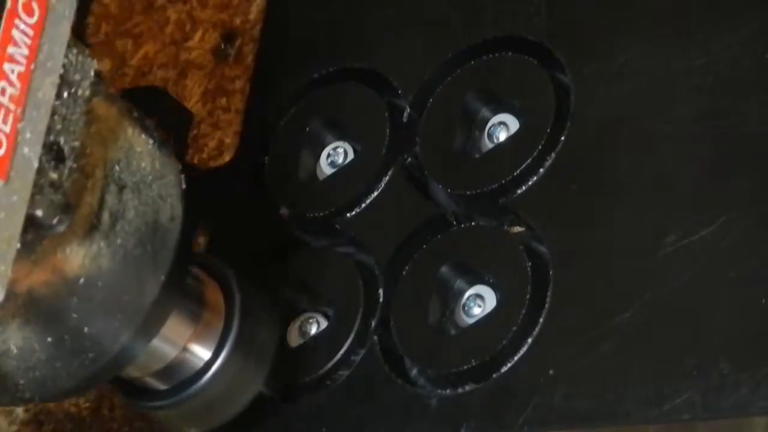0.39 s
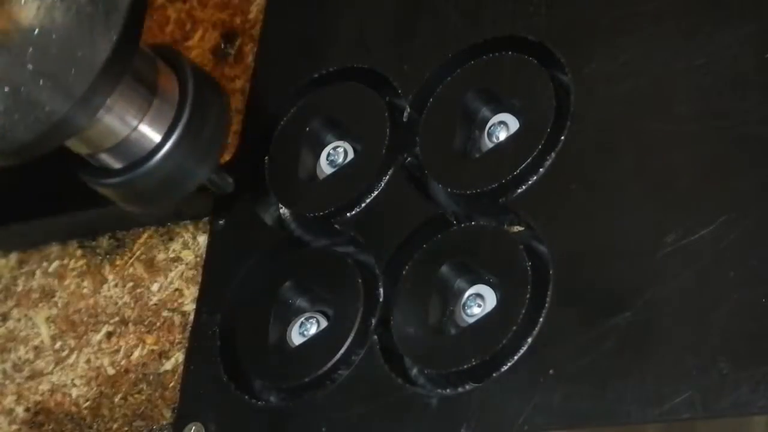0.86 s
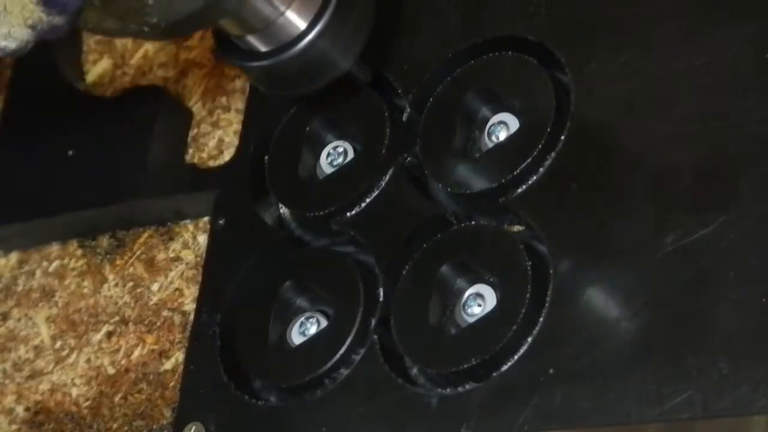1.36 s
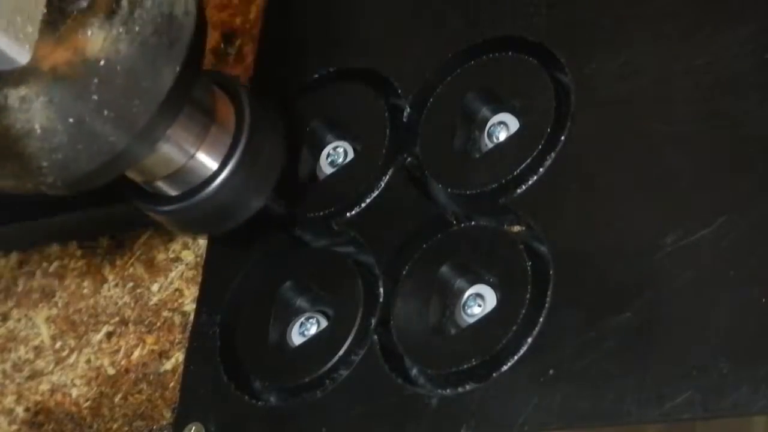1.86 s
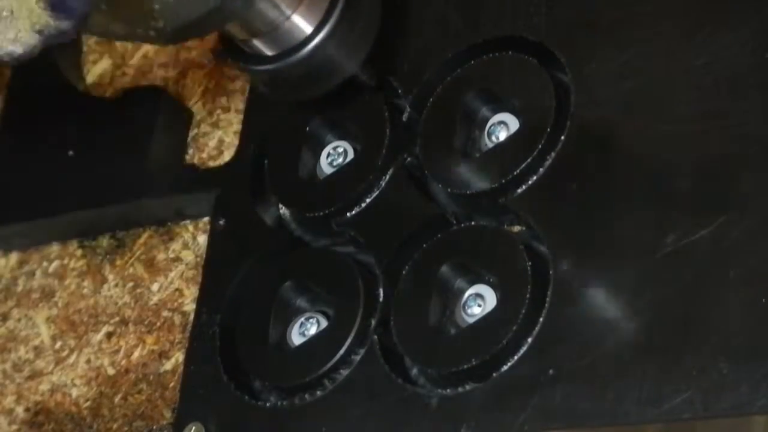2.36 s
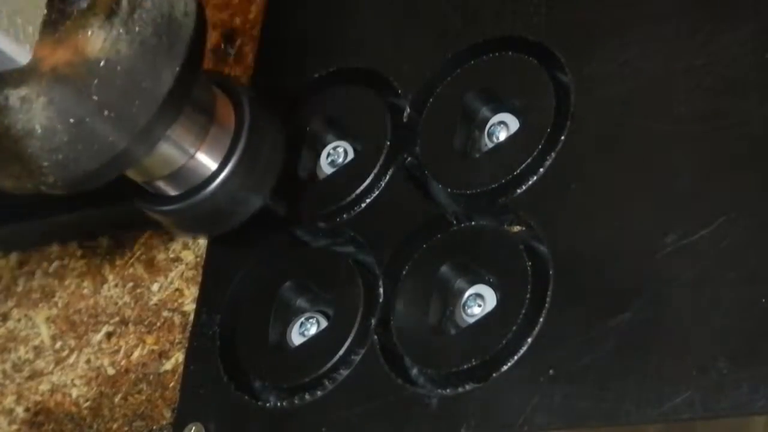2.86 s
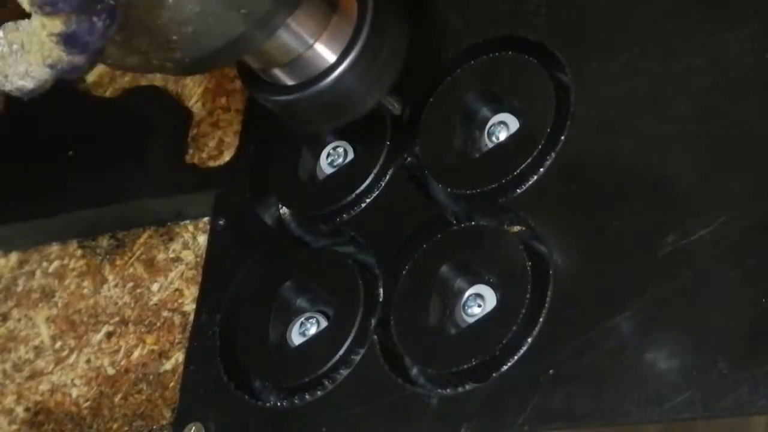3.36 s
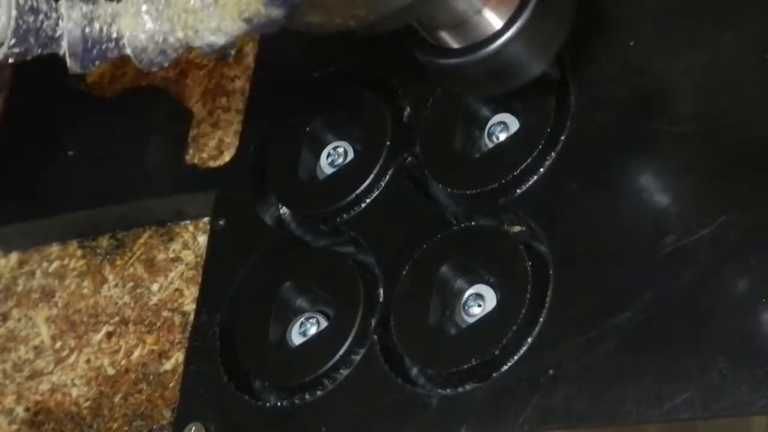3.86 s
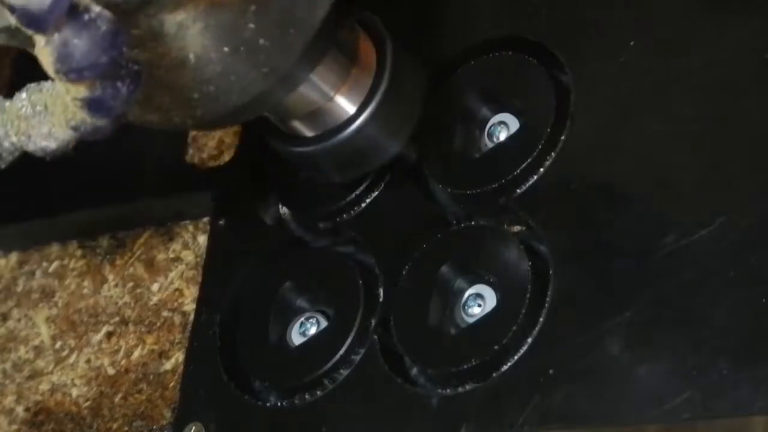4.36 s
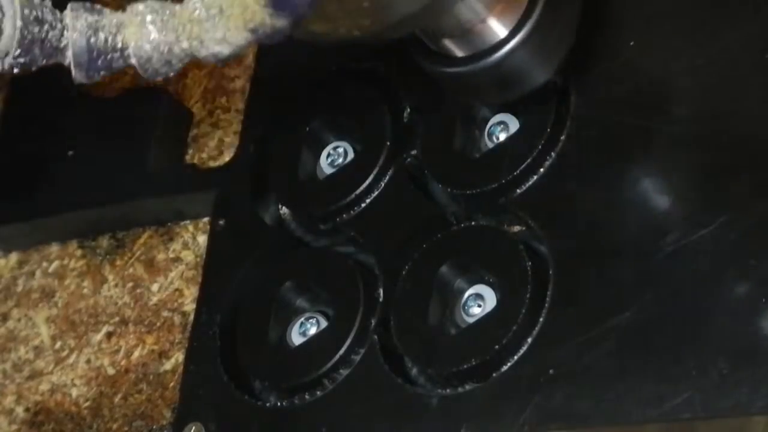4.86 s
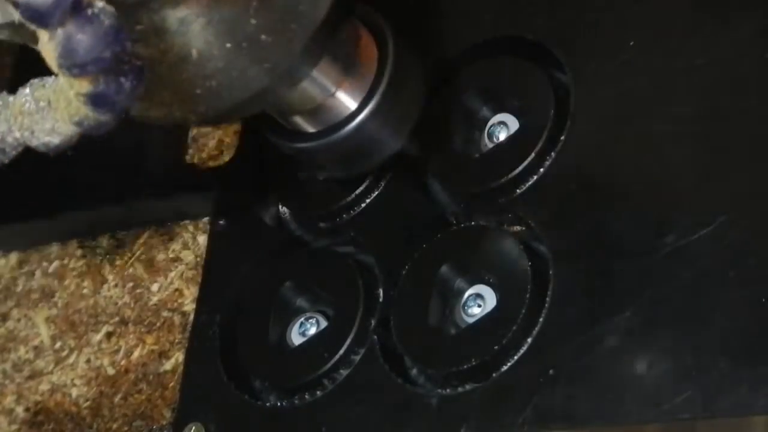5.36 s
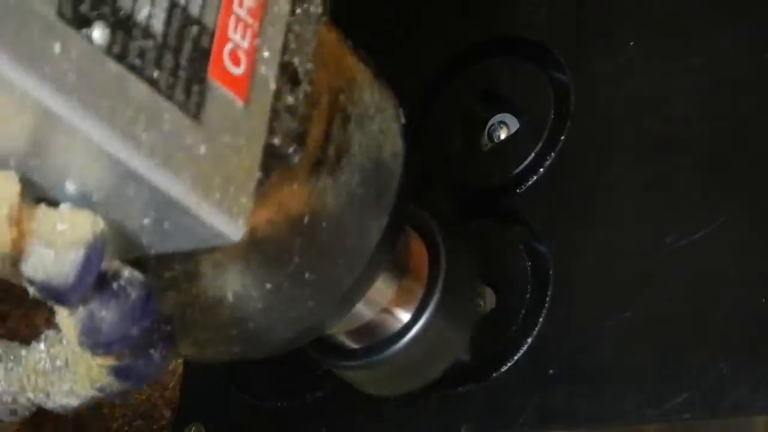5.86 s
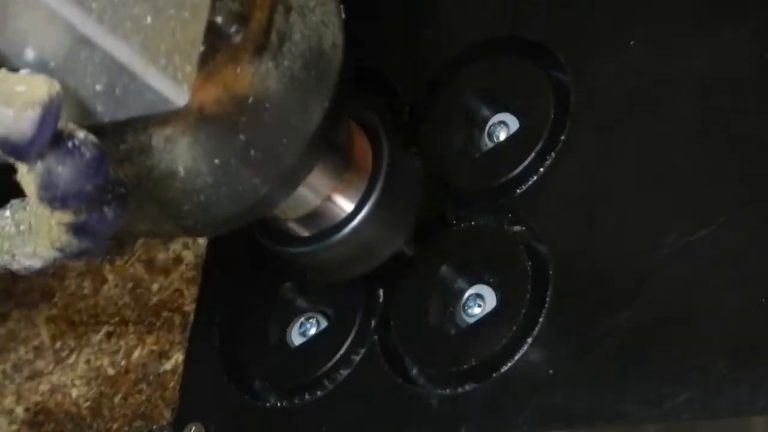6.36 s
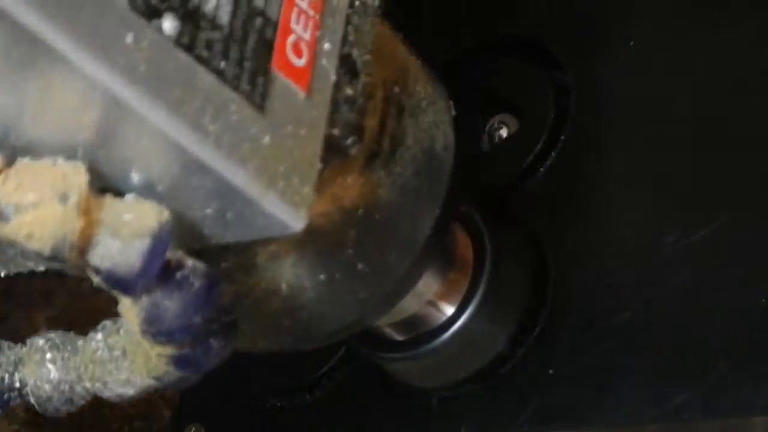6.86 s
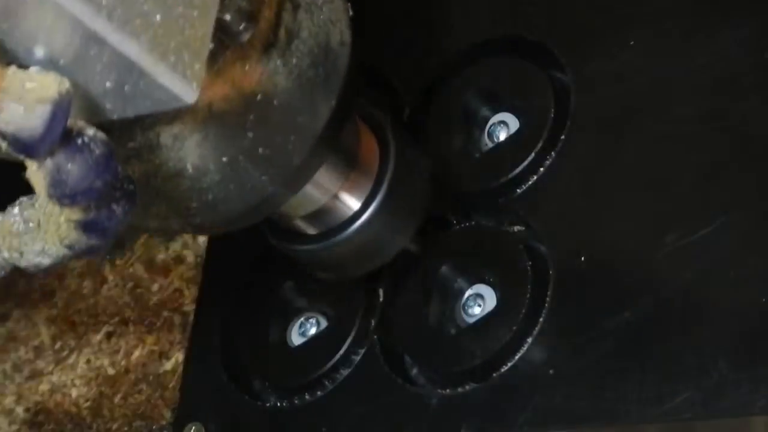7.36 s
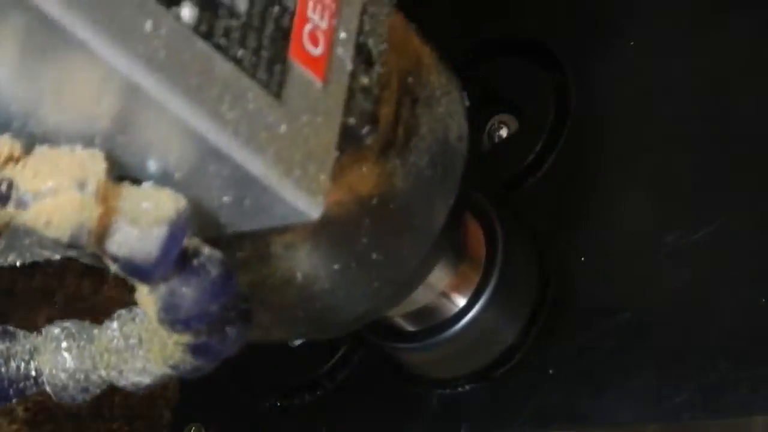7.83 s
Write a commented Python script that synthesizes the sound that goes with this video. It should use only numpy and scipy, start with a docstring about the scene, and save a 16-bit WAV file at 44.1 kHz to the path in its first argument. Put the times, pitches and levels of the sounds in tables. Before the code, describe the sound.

Continuous harsh, airy hiss from a compressed-air jet, almost without bass, close to an overdriven stereo microphone. A slightly trembling spindle whine and fainter, higher whistle run through it over a weak low machine wash. Low crackle sputters on and off irregularly. A faint motor squeal comes near one second, a stronger one past three, and a lower, doubled one shortly before six.

```python
"""A router spindle works over a plastic sheet while a compressed-air nozzle hisses loudly throughout.
The hiss is shaped noise; thin sine whines of spindle and drive, and steady hums, stand in it over a low wash.
From the start the overloaded microphone adds low crackle, the smoothed square of the sound,
which drops out again and again. An axis motor sings faintly near 0.9 s, then louder near 3.3 and 5.8 s."""
import sys
import numpy as np
from scipy import signal
from scipy.fft import rfft, irfft
from scipy.io import wavfile
from scipy.ndimage import uniform_filter1d

SR = 44100
rng = np.random.default_rng(int(sys.argv[2]) if len(sys.argv) > 2 else 0)


def field_ratio(decibels):
    """Amplitude ratio for a level in dB (20 dB per decade); scalars and array-likes work."""
    return 10 ** (np.asarray(decibels, dtype=float) / 20)


def int16_out(signal):
    """Quantize to a 16-bit WAV file."""
    q = np.round(np.clip(np.atleast_2d(signal).T, -1, 1) * 32767)
    wavfile.write(sys.argv[1], SR, q.astype(np.int16))


N = 351477
T = np.arange(N) / SR

# moving nozzle: time_s, hiss_db (before panning), whistle_centre_hz, facing (0 away - 1 facing)
NOZZLE = [(0, -23.5, 6600, 0.63), (.2, -25.5, 6340, 0.61), (.58, -23, 6440, .8), (.92, -24.5, 6740, 0.84),
          (1.35, -25.5, 6300, 0.35), (2.1, -23.5, 6200, .41), (2.62, -25.5, 6290, .5),
          (3.06, -23.5, 6600, 0.66), (3.5, -26.3, 6200, 0.59), (4.0, -24.5, 5900, 0.44),
          (4.8, -26, 6140, 0.42), (5.1, -25, 5800, 0.34), (5.68, -25.5, 6540, 0.52),
          (5.86, -24.5, 5930, 0.64), (6.28, -24, 6100, 0.5), (6.66, -26, 5900, 0.47),
          (7.26, -24, 6100, 0.49), (7.59, -26.5, 6200, 0.49), (7.97, -24.5, 6000, 0.52)]


def evened(x):
    """Scales to rms 1."""
    return x / np.sqrt(np.mean(x ** 2) + 1e-20)


def read(points, hz):
    """Spectrum value at hz, straight lines on a log axis."""
    f, value = np.transpose(points)
    return np.interp(np.log(hz + 1), np.log(f + 1), value)


def follow(rows, t):
    """Every column of a curve at times t."""
    s, *columns = np.transpose(rows)
    return [np.interp(t, s, c) for c in columns]


def wander(corner_hz):
    """Random curve of rms 1: white noise low-passed at corner_hz."""
    z = rfft(rng.standard_normal(N))
    lowpass = 1 / (1 + (np.fft.rfftfreq(N, 1 / SR) / corner_hz) ** 2)
    return evened(irfft(z * lowpass, N))


def patchwork(frames, bins, smooth_bins, smooth_frames):
    """Random patches of rms 1 over frequency and time."""
    grain = rng.standard_normal((frames, bins)).T
    grain = uniform_filter1d(grain, size=smooth_bins, axis=0)
    return evened(uniform_filter1d(grain, size=smooth_frames, axis=1))


def noise(field_db, size):
    """Stereo noise by inverse STFT: shared centre plus unrelated side, shaped by field_db(hz, s)."""
    # unrelated left-minus-right part, before its patches: freq_hz, side_re_centre_db
    sideways = [(60, -14), (300, -15), (800, 0.5), (1500, -11), (2300, -22), (2900, -12.5), (3600, -6.5),
                (4300, -10.5), (5000, -15.5), (6300, -15.5), (8000, -13), (10000, -10.5), (12000, -14.5),
                (15000, -15)]
    # stereo tilt: freq_hz, left_minus_right_db
    tilt = [(60, 0.0), (240, -3), (950, -4), (3770, 1), (15000, 0.5)]
    hop = size // 4
    frames, hz = N // hop + 5, np.fft.rfftfreq(size, 1 / SR)[:, None]
    a, b, c, d = rng.standard_normal((frames, size // 2 + 1, 4)).T
    centre = a + 1j * b
    side = field_ratio(read(sideways, hz)) * (c + 1j * d)
    side *= field_ratio(4.0 * patchwork(frames, len(hz), 9, 40))  # stereo width varies in random patches
    half_tilt_db = read(tilt, hz) / 2
    z = np.array([centre + side, centre - side])
    z *= field_ratio(field_db(hz, np.arange(frames) * hop / SR) + np.array([half_tilt_db, -half_tilt_db]))
    return signal.istft(z, nperseg=size, noverlap=size - hop)[1][:, :N]


def jet_field(hz, t):
    """Two colours blended as the nozzle turns, a sliding whistle band, cavity bands and drifting patches."""
    # relative hiss spectra before the bass cut, nozzle facing and away: freq_hz, density_db
    facing_spectrum = [(1180, -34), (2000, -38), (2520, -17.5), (3070, -8.5), (4300, -12), (5060, -8.5),
                       (5560, -3), (6330, -2.5), (8120, -13), (9000, -10), (10200, -6.5), (13000, 1.5),
                       (15600, -6.5)]
    away_spectrum = [(1180, -44), (2000, -13), (2460, -15.5), (3050, -4), (3130, -6.5), (4410, -5),
                     (5020, -3.5), (5560, -3.5), (6220, -0.5), (7640, -5), (10600, -9.5), (12800, 0.5),
                     (15600, -3)]
    # gaps around spindle and table colour the hiss: centre_hz, width_hz, gain_db
    cavities = [(3460, 255, 2.5), (4720, 68, 4.5), (5150, 140, 1), (5560, 190, -5.5), (6110, 94, 3),
                (6830, 200, 2.5), (7230, 140, 1.5), (9230, 260, 3.5), (11000, 300, 0.5), (11950, 180, -2.5),
                (13240, 330, 2), (14300, 250, 3.5), (15320, 350, 5)]
    _, centre_hz, facing = follow(NOZZLE, t)
    facing = np.clip(facing, 0, 1)
    body = facing * read(facing_spectrum, hz) + (1 - facing) * read(away_spectrum, hz)
    body += 25 * np.log10(np.clip(hz / 1200, 1e-3, 1))  # a small jet makes no bass
    whistle = 2.9 * np.exp(-((hz - centre_hz) / 350) ** 2)
    colour = sum(db * np.exp(-((hz - f) / width_hz) ** 2) for f, width_hz, db in cavities)
    return body + whistle + colour + 0.95 * patchwork(len(t), len(hz), 7, 24)


def air_jet():
    """Turbulent hiss; eddies make all its bands flutter together."""
    hiss = noise(jet_field, size=512)
    flutter_db = 1.0 * wander(56) + 0.62 * wander(380) + 1.0 * wander(1100)
    hiss = hiss * field_ratio(flutter_db)
    slow_rms = np.sqrt(uniform_filter1d(hiss.mean(0) ** 2, size=5000))
    return field_ratio(follow(NOZZLE, T)[0]) * hiss / slow_rms


def nearness():
    """How far the hiss stands above its usual -25 dB, in dB."""
    return follow(NOZZLE, T)[0] + 25


def tone(hz, rms_db, blur_hz):
    """A sine whose pitch trembles by blur_hz rms."""
    turns = np.cumsum(hz + blur_hz * wander(13.1)) / SR + rng.random()
    return np.sqrt(2) * field_ratio(rms_db) * np.sin(2 * np.pi * turns)


def motors():
    """Trembling sines: spindle whine with its octave, drive whistle, hums and gated axis songs."""
    # spindle whine, mean level: time_s, level_db
    whine = [(0, -45), (.26, -51.5), (.53, -42.5), (.9, -43), (1.15, -46), (1.46, -43), (1.63, -49.5),
             (2.06, -42.5), (2.7, -48), (3, -45), (3.4, -50), (4.0, -44), (4.55, -50.5), (4.97, -43),
             (5.65, -50.5), (5.88, -42.5), (6.04, -54), (6.25, -44), (6.6, -48), (7.26, -44), (7.42, -51.5),
             (7.97, -40.5)]
    # hums, two of them a close pair, mean level: pitch_hz, level_db
    hums = [(1369, -60.5), (1353, -59), (2777, -60)]
    # axis motor during fast moves, mean level: start_s, end_s, pitch_hz, level_db
    axis_songs = [(.85, 1.02, 9530, -55), (3.245, 3.45, 9535, -41), (3.245, 3.45, 9465, -43),
                  (3.245, 3.45, 9600, -49), (5.645, 5.93, 4021, -43), (5.65, 5.92, 4095, -45),
                  (5.63, 5.95, 9470, -48)]
    whine_hz, drive_hz = 3190.5, 12581
    octave_db = -50 + 2 * nearness()  # octave and whistle swell with the hiss
    whistle_db = -50 + 2.2 * nearness()
    out = tone(whine_hz, follow(whine, T)[0] + 1.06 * wander(12), blur_hz=3.15)
    out += tone(2 * whine_hz, octave_db + 3.4 * wander(4.2), blur_hz=3.38)
    out += tone(drive_hz, whistle_db + 3.2 * wander(6), blur_hz=2.3)
    for hz, db in hums:
        out += tone(hz, db + 0.61 * wander(13.0), blur_hz=1.575)
    for start_s, end_s, hz, db in axis_songs:
        gate = np.clip(np.minimum((T - start_s) / 0.008, (end_s - T) / 0.035), 0, 1)
        out += gate * tone(hz, db + 2.0 * wander(25), blur_hz=5.0)
    return out


def crackling():
    """Overload strength: 0 in pauses and brief random breaks; bursts beside the longer gaps hit harder."""
    # longer stops of the crackle: start_s, length_s
    pauses = [(0.179, .018), (.24, 0.023), (0.766, 0.26), (1.03, 0.036), (1.078, 0.021), (1.126, 0.058),
              (1.568, .023), (1.598, 0.024), (1.656, 0.022), (2.149, 0.031), (2.562, 0.022), (2.589, .022),
              (2.636, .034), (3.148, 0.04), (3.194, .084), (3.279, 0.026), (3.329, 0.029), (3.394, .053),
              (3.472, .025), (3.523, 0.026), (3.946, .05), (4.388, .022), (4.632, 0.024), (4.951, 0.044),
              (5.09, 0.027), (5.429, 0.059), (5.571, .023), (5.597, .039), (5.72, 0.024), (5.975, .12),
              (6.299, 0.053), (6.764, 0.018), (6.789, 0.026), (6.867, .028), (6.91, .03), (7.044, 0.022),
              (7.768, .037), (7.812, .021), (7.859, .026), (7.911, 0.023)]
    # stretches in which the crackle breaks up often: start_s, end_s
    sputters = [(.15, .35), (.62, .76), (1.97, 2.15), (2.54, 2.82), (3.05, 3.6), (4.05, 4.27), (4.43, 4.57),
                (5.3, 5.42), (5.9, 6.19), (7.0, 7.37), (7.68, 7.97)]
    on = np.ones(N)
    margin = np.full(N, 1.7)  # a break comes when chance falls this many rms below 0
    for start_s, length_s in pauses:
        on[round(start_s * SR):round((start_s + length_s) * SR)] = 0
    for start_s, end_s in sputters:
        margin[round(start_s * SR):round(end_s * SR)] = 0.55
    on *= wander(40) > -margin
    lone = uniform_filter1d(1 - on, size=900)
    on *= wander(110) > -2.0
    gate = uniform_filter1d(uniform_filter1d(on, size=50), size=40)
    each_side = field_ratio(0.77 * np.array([wander(57), wander(60)]))  # the two capsules do not overload alike
    return gate * (1 + 0.57 * lone) * each_side


def overload(dry):
    """Squaring, as one-sided overload does, turns the flutter of the hiss into low crackle."""
    # relative weighting of the crackle: freq_hz, density_db
    crackle_spectrum = [(4, -76), (20, -48), (45, -41), (100, -24), (200, -11.5), (370, -9.5), (550, -3.5),
                        (850, -2.5), (1400, -4.5), (2200, -10), (2800, -14), (3600, -40)]
    crackle_db = -45.5
    # treble-weighted noise, mostly common to both sides, heard only through the overload
    drive = np.diff(rng.standard_normal((2, N + 1)) + 4.7 * rng.standard_normal(N + 1))
    unheard = 0.185 * drive * np.std(dry)
    bent = (dry + unheard) ** 2
    offset = uniform_filter1d(bent, size=4000)
    bent = (bent + offset) * crackling()  # the shifted rest position thumps at each start and stop
    hz = np.fft.rfftfreq(N, 1 / SR)
    low = irfft(rfft(bent) * field_ratio(read(crackle_spectrum, hz)), N)
    return field_ratio(crackle_db) * evened(low)


def shop():
    """The low steady wash of the machine in the workshop: shaped noise."""
    # relative wash spectrum: freq_hz, density_db
    wash_spectrum = [(20, -34), (60, -26), (200, -19), (300, -13), (500, -9), (800, -0.5), (1200, 0),
                     (1600, -0.5), (2200, -3.5), (2900, -30)]
    wash_db = -53.5
    return field_ratio(wash_db) * evened(noise(lambda hz, t: read(wash_spectrum, hz) + 0 * t, size=2048))


def scene():
    """All sources at the microphone, jet and motors panned as the head wanders across."""
    # head position: time_s, left_minus_right_db
    drift = [(0, .1), (3.2, 0), (3.7, -.2), (5.2, 0), (6.1, .8), (7.97, .7)]
    pan_db = follow(drift, T)[0] / 2
    return (air_jet() + motors()) * field_ratio(np.array([pan_db, -pan_db])) + shop()


def roll_off(x):
    """The treble ends steeply here."""
    return signal.sosfilt(signal.butter(12, 17020, fs=SR, output="sos"), x)


def record(dry):
    """Adds the microphone's overload crackle, then the band limit."""
    edge_hz = 15760
    full = dry + overload(dry)
    lowpass = signal.firwin(1023, edge_hz, window=("kaiser", 7), fs=SR)
    mix = signal.oaconvolve(full, lowpass[None], "same")
    return roll_off(mix)


dry = scene()
out = record(dry)
int16_out(out)
```